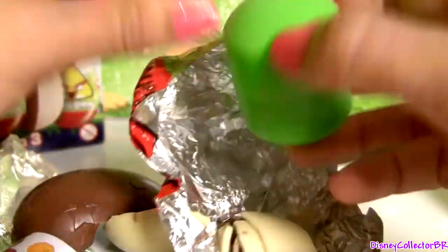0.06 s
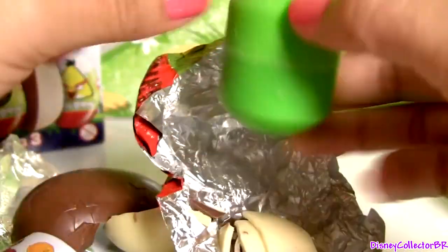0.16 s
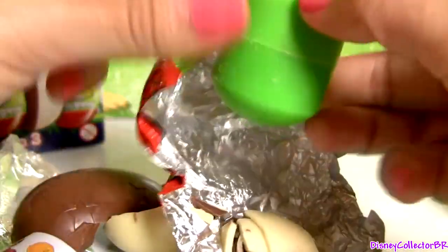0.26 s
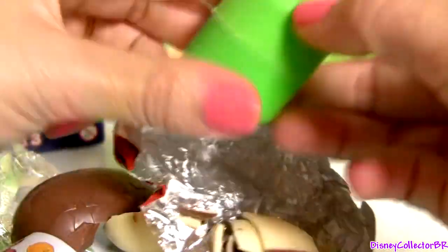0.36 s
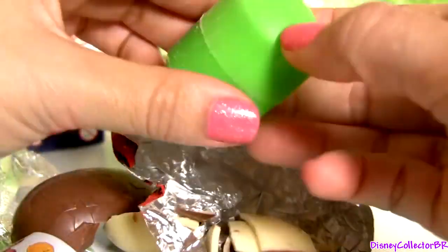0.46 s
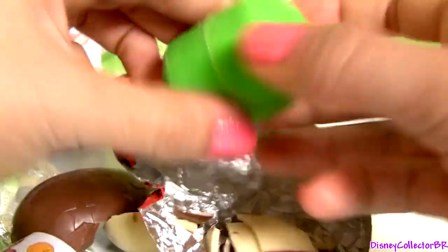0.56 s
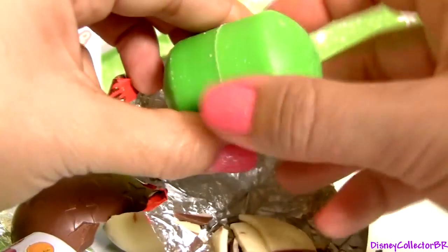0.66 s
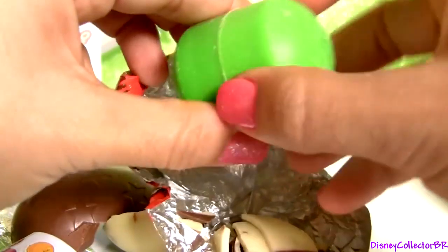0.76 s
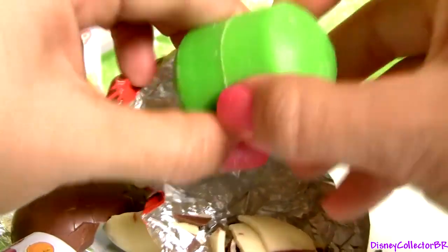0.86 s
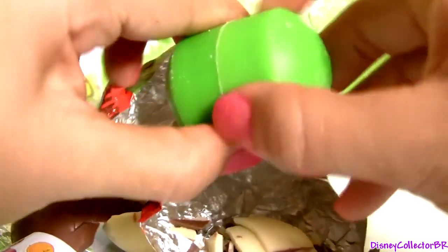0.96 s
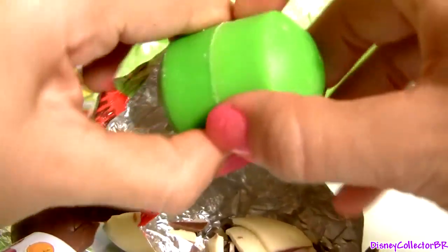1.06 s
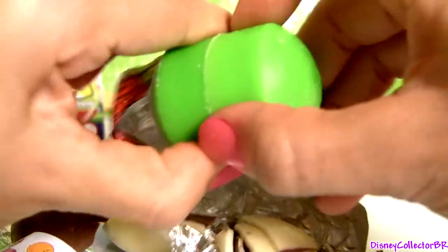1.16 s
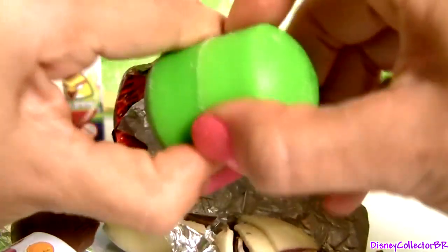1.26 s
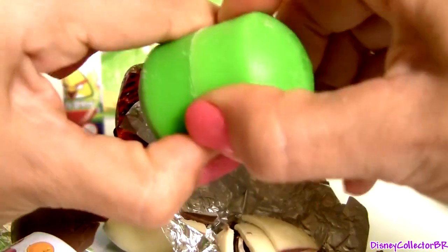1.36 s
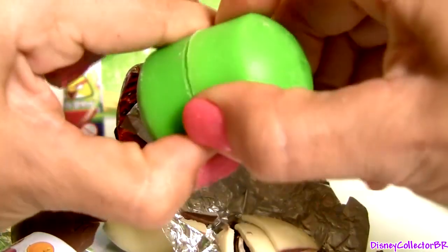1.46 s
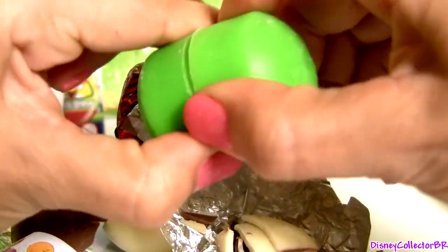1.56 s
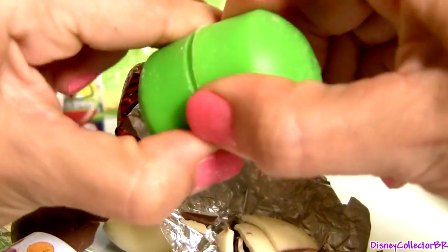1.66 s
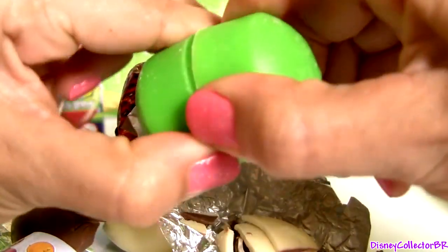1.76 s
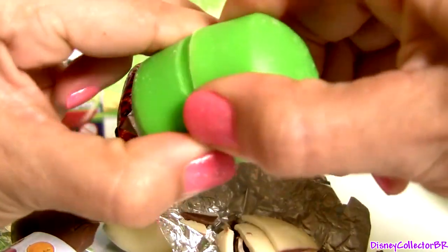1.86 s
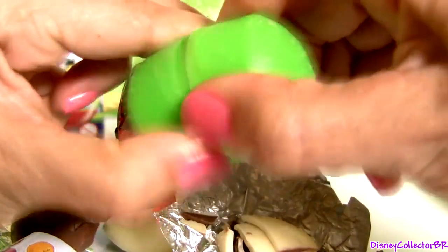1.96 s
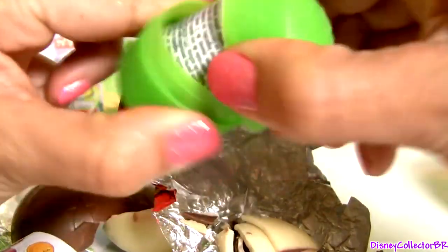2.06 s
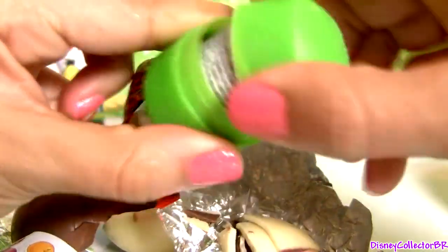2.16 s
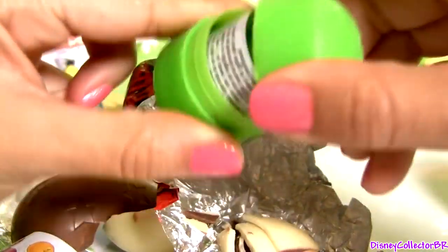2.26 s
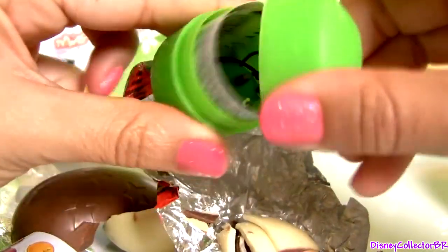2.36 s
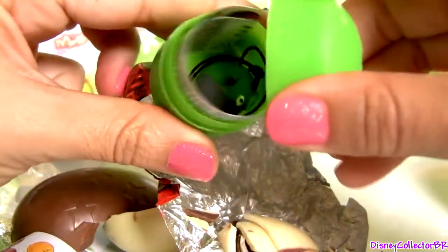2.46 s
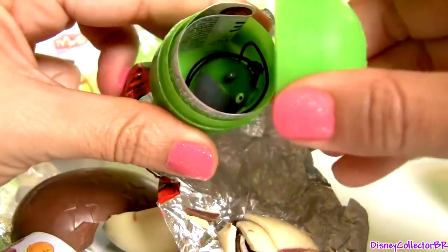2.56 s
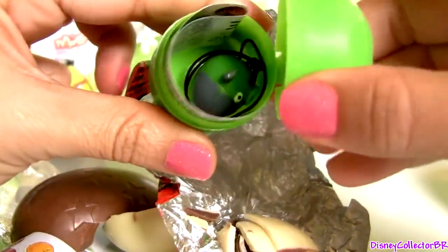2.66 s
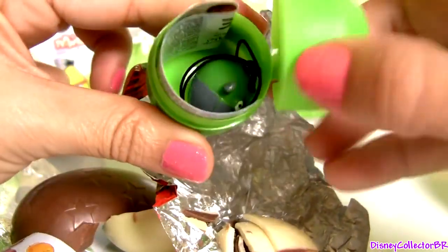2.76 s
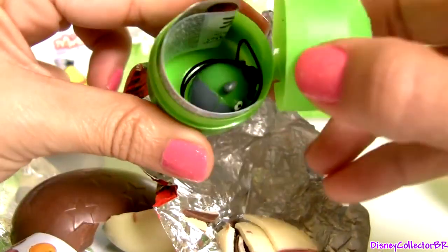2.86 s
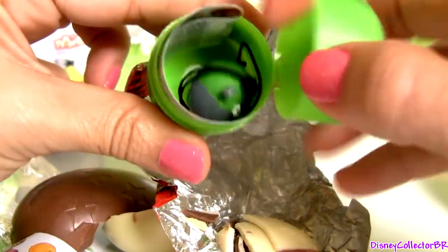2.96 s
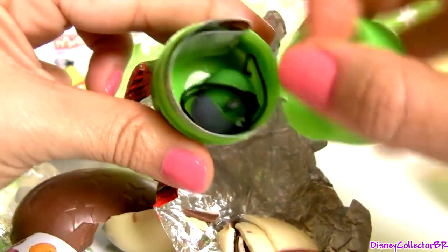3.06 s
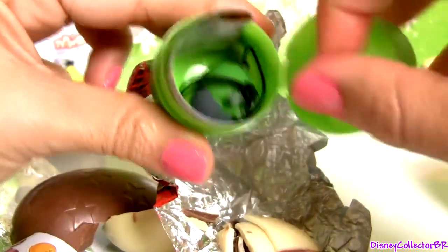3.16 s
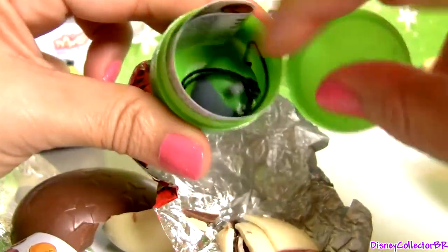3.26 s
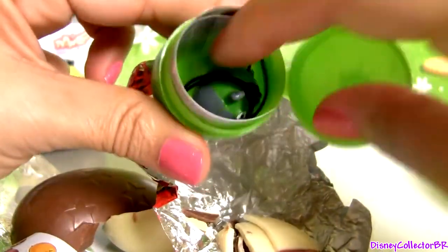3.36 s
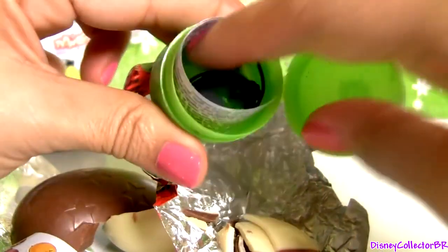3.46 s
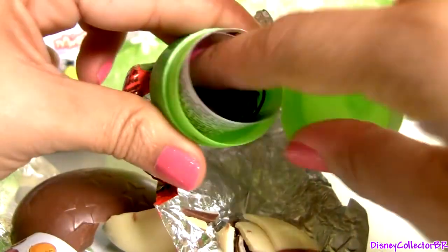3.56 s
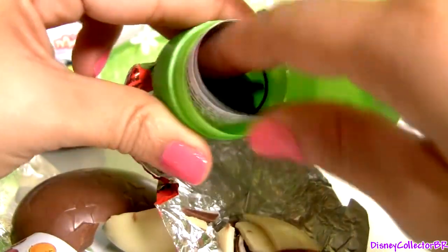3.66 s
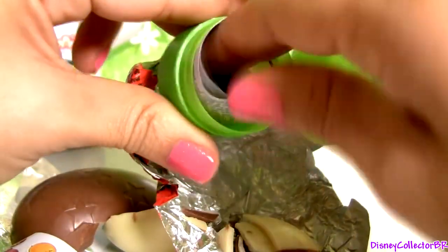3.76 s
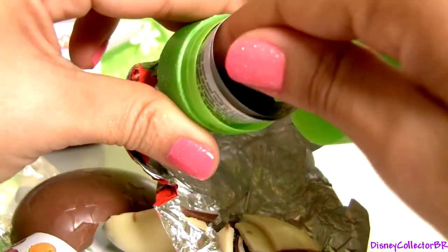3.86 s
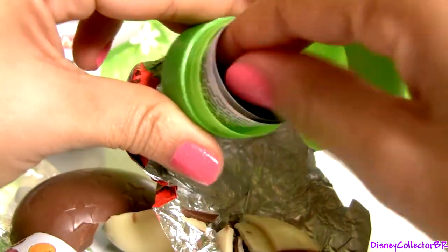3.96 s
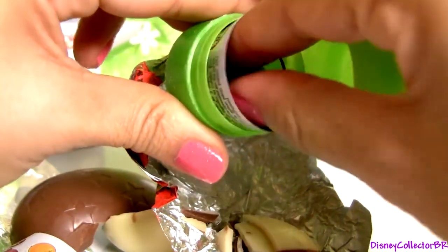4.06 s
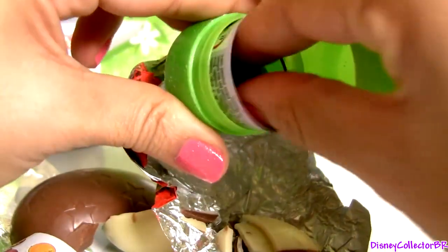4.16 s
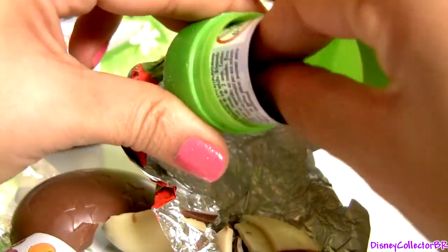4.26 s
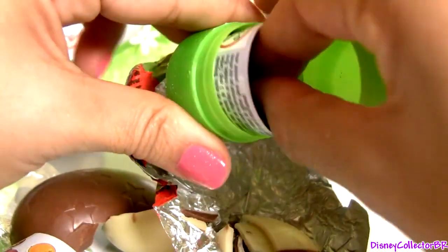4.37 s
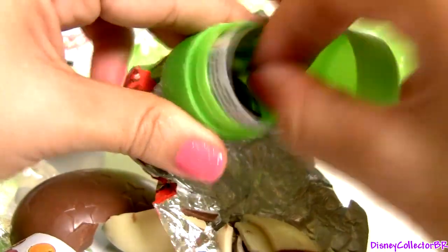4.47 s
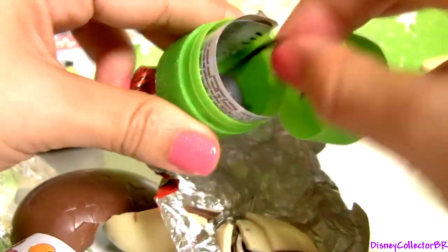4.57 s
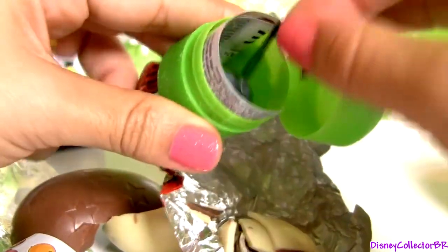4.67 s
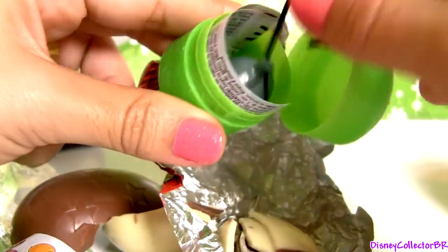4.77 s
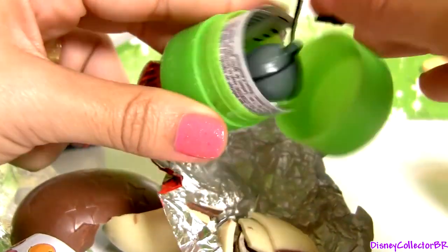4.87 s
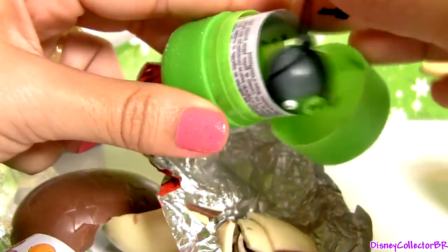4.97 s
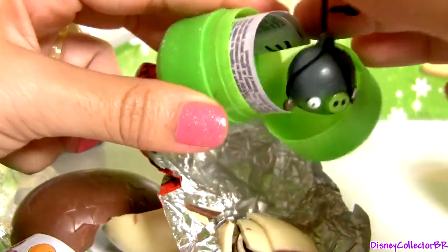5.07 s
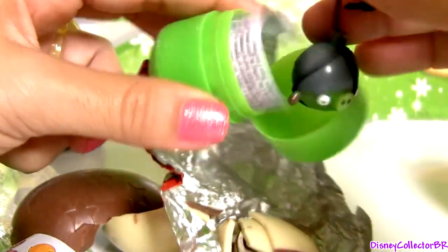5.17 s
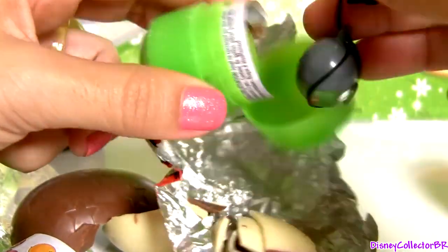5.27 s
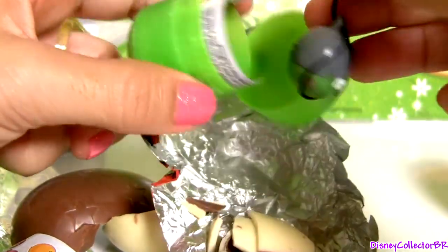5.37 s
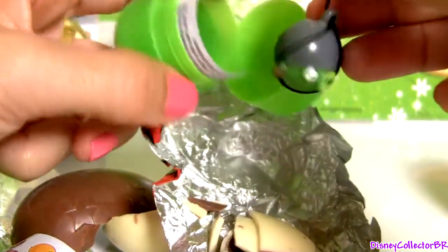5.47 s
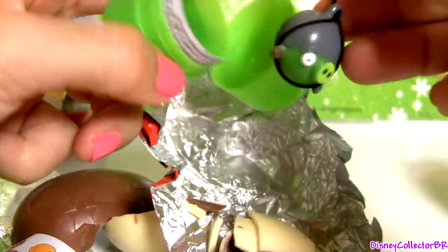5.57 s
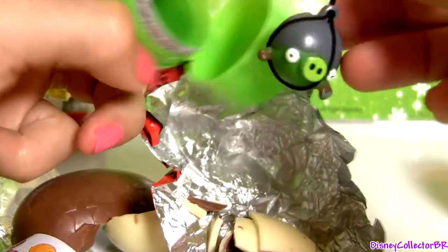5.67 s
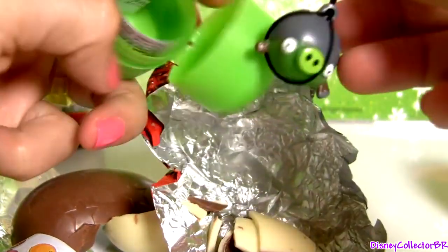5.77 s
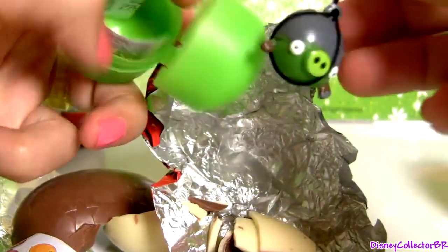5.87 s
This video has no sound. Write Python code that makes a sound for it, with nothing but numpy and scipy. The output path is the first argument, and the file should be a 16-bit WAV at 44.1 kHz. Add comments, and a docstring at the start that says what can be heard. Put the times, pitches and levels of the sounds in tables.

```python
"""Scuffs and clicks of fingers turning a small hollow plastic capsule, a sharp snap as the squeezed seam
gives, and a pop as the lid comes off. Then a toy on a string is fished out past a rolled paper slip.
Skin, nails and paper stick and slip on the shell, which makes it hiss and squeak; each tap or knock
of the toy makes it ring briefly. Behind it all a small room hums and echoes."""
import sys
import numpy as np
from scipy import signal
from scipy.fft import rfft, irfft, next_fast_len
from scipy.io import wavfile
from scipy.ndimage import uniform_filter1d, map_coordinates

SR = 44100
rng = np.random.default_rng(int(sys.argv[2]) if len(sys.argv) > 2 else 0)


def to_wav(sig):
    """Store sig (one row per channel, or 1-D mono) as 16-bit WAV at the path in sys.argv[1].

    Samples outside -1..1 are clipped; the rate is SR.
    """
    pcm = np.clip(np.atleast_2d(sig), -1, 1) * 32767
    pcm = np.round(pcm).astype(np.int16)
    wavfile.write(sys.argv[1], SR, pcm.T)  # frames by channels


N = 260270


def amp(db):
    """Turn decibels into a gain."""
    return 10 ** (np.asarray(db) / 20)


def unit(x):
    """Scale a signal to an average (rms) size of 1."""
    return x / np.sqrt(np.mean(x ** 2) + 1e-20)


def along(points, hz):
    """Read between (f/Hz, value) points on a logarithmic frequency axis."""
    freqs, values = np.transpose(points)
    return np.interp(np.log(hz + 1), np.log(freqs + 1), values)


def curves(rows):
    """Join rows of (t/s, values...) with straight lines: one curve for each value column."""
    times, *columns = np.transpose(rows)
    return [np.interp(np.arange(N) / SR, times, column) for column in columns]


def wobble(rate):
    """A smooth curve through `rate` random points a second."""
    points = rng.standard_normal(int(N * rate / SR) + 4)
    return map_coordinates(points, [np.arange(N) * rate / SR])


def filtered(x, response):
    """Give each frequency in x the gain response(hz)."""
    size = next_fast_len(N + SR // 2)
    return irfft(rfft(x, size) * response(np.fft.rfftfreq(size, 1 / SR)), size)[..., :N]


def stereo_noise(response, likeness, patchy_db):
    """Noise whose tone colour drifts in patches; a likeness of 1 makes left and right the same."""
    spectrum = signal.stft(rng.standard_normal((2, N)), nperseg=256)[2]
    patches = uniform_filter1d(rng.standard_normal(spectrum.shape[1:]), size=2, axis=0)
    patches = uniform_filter1d(patches, size=15, axis=1)
    pair = signal.istft(spectrum * amp(patchy_db * unit(patches)), nperseg=256)[1][:, :N]
    angle = lambda hz: np.arccos(np.clip(along(likeness, hz), -1, 1)) / 2
    mid, side = filtered(pair, lambda hz: response(hz) * [np.cos(angle(hz)), np.sin(angle(hz))])
    return unit(np.array([mid + side, mid - side]))


def room_hum():
    """Steady low room noise with two narrow droning bands."""
    colour = [(28, -2.5), (60, -8), (160, -5.5), (400, -5.5), (1000, -9.5), (1500, -8.5), (2000, -18.5),
              (5000, -27.5), (16000, -33)]  # tone colour of the noise: f/Hz, relative level/dB
    likeness = [(60, 0.017), (500, 0.075), (15000, .05)]  # how alike left and right are: f/Hz, likeness
    drones = [(290, 22, -60), (772, 48, -63.5)]  # droning bands: f/Hz, width/Hz, level/dB
    out = amp(-51) * stereo_noise(lambda hz: amp(along(colour, hz)), likeness, patchy_db=1.0)
    for centre_hz, width_hz, db in drones:
        band = lambda hz: 1 / (1 + ((hz - centre_hz) / width_hz * 2) ** 2)
        out += amp(db) * stereo_noise(band, [(300, 0.87)], patchy_db=1.5)
    return out


def room_echo(x):
    """Table and walls answer after 5 ms; each frequency then dies away at its own speed."""
    fade_times = [(250, 0.47), (2000, 0.3), (12000, 0.069)]  # length of the echo: f/Hz, time to fade by 60 dB/s
    hz, t, spectrum = signal.stft(rng.standard_normal((2, SR // 2)), SR, nperseg=256)
    fade = amp(-60 * t / along(fade_times, hz)[:, None])
    mid, side = signal.istft(spectrum * fade, SR, nperseg=256)[1]
    tail = np.array([mid + .5 * side, mid - .5 * side])
    delayed = np.pad(x, (round(.005 * SR), 0))
    return signal.fftconvolve(delayed[None], tail / np.linalg.norm(tail[0]), axes=1)[:, :N]


def squeaks_and_ringing():
    """Dragging skin makes the shell squeak; the hollow capsule rings on briefly after the toy knocks."""
    # rough tones (the ringing at 5.117 s, the rest squeaks): t/s, length/s, f/Hz, level/dB
    tones = [(0.19, 0.024, 4150, -31), (0.395, 0.04, 3970, -33), (1.185, 0.023, 4630, -45),
             (1.215, 0.02, 4600, -38), (3.402, 0.16, 2650, -50), (3.45, 0.1, 4900, -48),
             (5.117, 0.072, 1954, -48), (5.479, 0.041, 3980, -32)]
    out, t = np.zeros(N), np.arange(N) / SR
    wavering_time = np.cumsum(1 + .06 * wobble(900)) / SR  # makes the pitch unsteady
    flutter = amp(2.7 * wobble(250))
    for start, length, hz, db in tones:
        swell = np.sin(np.pi * np.clip((t - start) / length, 0, 1))
        out += amp(db) * swell * np.sin(2 * np.pi * hz * wavering_time)
    return out * flutter


def rubbing_power():
    """Holding, sliding and slipping add up to the power in the shell wall, the air inside and the hiss."""
    hold = [(0.0, -35.5), (0.23, -47.5), (1.17, -50), (1.35, -74), (1.68, -71), (2.87, -58), (3.37, -55.5),
            (3.7, -48.5), (4.14, -55), (4.58, -49), (4.73, -47), (5.24, -55), (5.59, -58), (5.9, -56)]  # fingers shifting their hold: t/s, level/dB
    # skin and paper sliding: t/s, length/s, level/dB, swell/dB, weight (wall over hiss)/dB
    slides = [(0.0, 0.06, -42.5, 11, -1), (0.107, 0.12, -32.5, 3, -2.5), (0.318, 0.062, -53.5, -3, 6.5),
              (0.372, 0.02, -40, 8, -12), (0.395, 0.095, -32.5, -2.5, -3.5),
              (0.526, 0.02, -40.5, -11, -4.5), (0.634, 0.057, -35.5, -4, -14.5),
              (0.698, 0.1, -40, -18.5, -12.5), (0.796, 0.051, -36.5, -3, -7.5),
              (0.921, 0.15, -42.5, -4.5, -3), (1.074, 0.088, -44.5, 10.5, -4),
              (1.168, 0.125, -39, 4, -15.5), (1.371, 0.042, -38, -10.5, -8.5),
              (1.513, 0.075, -41.5, -0.5, -7.5), (1.605, 0.043, -47.5, -10, -8.5),
              (2.053, 0.057, -36.5, -21, -4), (2.222, 0.042, -50.5, 11, -6), (2.393, 0.048, -52.5, 1, -2),
              (2.517, 0.036, -50, 3, 4), (2.55, 0.068, -56.5, 1, 0), (2.757, 0.017, -38.5, -2, -12),
              (2.774, 0.086, -54, 4, -6), (2.932, 0.016, -48, -15, -1), (3.01, 0.074, -54, 8, -10),
              (3.098, 0.022, -44.5, -2, -13), (3.134, 0.027, -48, -9, -5.5), (3.163, 0.033, -46, -9, -11),
              (3.226, 0.054, -41, -1, -3), (3.394, 0.19, -46, 2, -10), (3.598, 0.153, -49.5, 9, -24),
              (3.762, 0.054, -40.5, 15, -28), (3.837, 0.088, -41.5, 1, -25), (4.1, 0.1, -44, -5, -17),
              (4.276, 0.059, -45.5, 9, -16), (4.382, 0.075, -45, 2, -6), (4.506, 0.1, -46.5, 3, -1),
              (4.622, 0.17, -46.5, -10.5, -3.5), (5.223, 0.1, -46, -7.5, -7), (5.409, 0.026, -39.5, -8, -5),
              (5.435, 0.11, -36, -10.5, -6), (5.558, 0.15, -46.5, 0.5, 0.5), (5.705, 0.067, -42, -6, -4.5),
              (5.801, 0.04, -49.5, 9, -9)]
    slips = [(0.0149, -20, -15), (0.034, -21, -5), (0.103, -21, -7), (0.196, -7.5, -16), (0.397, -8.5, -12),
             (0.46, -18, 1), (0.7033, -22, -12), (0.842, -17.5, -10), (0.916, -18, -24),
             (0.934, -19.5, -15), (0.957, -17.5, -27), (0.9753, -14.5, -31), (0.9927, -17.5, -1),
             (1.035, -12.5, -9.5), (1.2231, -18, -14), (1.378, -14.5, -17.5), (1.389, -19.5, -7),
             (1.5744, -30, -10), (1.6444, -33, -5), (2.0654, -16.5, -10), (2.0954, -30, -10),
             (2.535, -29.5, -8), (2.6805, -36.5, 1), (3.001, -30.5, -8), (3.3054, -19, -1),
             (3.324, -28, -1), (3.3867, -28.5, -4), (3.8616, -17.5, -15), (3.8721, -13, -23),
             (3.9, -23, -11), (3.972, -30, -16), (4.126, -21, -15), (4.3196, -20.5, -15), (4.41, -25, -18),
             (4.513, -26, -12), (4.619, -29, -12), (5.1947, -28, -2), (5.226, -31, -8), (5.283, -11.5, -3),
             (5.439, -12.5, -14), (5.7264, -28, -8), (5.801, -26, -11)]  # a nail catches and slips free: t/s, level/dB, weight/dB
    slide_rise_s, linger_fade_s = 0.0031, 0.21
    slip_rise_s, slip_fade_s = 0.0013, 0.036
    t = np.arange(N) / SR
    open_db = 2 * (t > 1.9)  # the air inside sounds louder once the capsule is open

    def bands(db, weight_db):
        air_db = db - 3.5 + 0.25 * weight_db + open_db
        return amp([db + weight_db, air_db, db]) ** 2

    power = bands(curves(hold)[0] - 4, weight_db=-3)
    for start, length, db, swell_db, weight_db in slides:
        age = t - start
        rise = np.clip(age / slide_rise_s, 0, 1) ** 2
        progress = np.clip(age / length, 0, 1)
        linger_db = (age > length) * (-10 - 60 * (age - length) / linger_fade_s)  # a light drag after
        power += rise * bands(db + swell_db * (progress - .5) + linger_db, weight_db)
    for start, db, weight_db in slips:
        age = np.clip(t - start, 0, 1)
        rise = (1 - np.exp(-age / slip_rise_s)) ** 2
        power += rise * bands(db - 8.5 - 60 * age / slip_fade_s, weight_db)
    return power


def rubbing():
    """Skin, nails and paper stick and slip on the shell, so three bands of noise stutter together."""
    # tone colours of the shell wall, the air inside and the hiss of skin: f/Hz, relative level/dB
    wall = [(47, -43), (80, -17), (233, -7.5), (404, 3), (591, -5), (755, -3.5), (1010, -5), (1500, -14),
            (1950, -15.5), (3300, -120)]
    air = [(590, -53), (1000, -11.5), (1840, 0), (2070, -3), (2250, -5.5), (3400, -9.5), (4420, -15),
           (7480, -120)]
    hiss = [(1530, -68), (2600, -11), (3420, -9), (3920, -4), (5390, -3), (7650, 0), (8840, -5.5),
            (12800, -9), (16000, -11.5)]
    likeness = [(100, 0.74), (600, 1), (2500, 1), (8000, 0.65), (15000, 0.41)]  # how alike left and right are: f/Hz, likeness
    stutter = 1.36 * wobble(110) + 2.16 * wobble(600)
    carry = np.exp(-1 / (0.00052 * SR))  # the shell sounds on for a moment after a touch
    gains = np.sqrt(signal.lfilter([1 - carry], [1, -carry], rubbing_power()))
    hiss_db = 20 * np.log10(gains[-1] + 1e-9)
    pressure = np.clip((hiss_db + 60) / 22, .3, 1.3)  # light slides are smooth, firm ones catch
    gains *= amp(pressure * stutter)
    return sum(gain * stereo_noise(lambda hz: amp(along(colour, hz)), likeness, patchy_db)
               for gain, colour, patchy_db in zip(gains, (wall, air, hiss), (3, 4, 4)))


def lid_pop():
    """The air inside gives short, hollow rising tones, roughened by the scraping rim."""
    glides = [
        [(2.056, 413.8, -25), (2.062, 583, -21), (2.069, 1014, -22), (2.077, 1110, -23), (2.085, 1250, -55)],
        [(2.408, 1690, -51), (2.418, 1724, -35), (2.44, 1810, -43), (2.452, 1850, -54)],
    ]  # one list for the pop, one for a hinge squeak: t/s, f/Hz, level/dB
    out, t = np.zeros(N), np.arange(N) / SR
    for glide in glides:
        hz, db = curves(glide)
        sounding = (t > glide[0][0]) & (t < glide[-1][0])
        out += sounding * amp(db + 3.2 * wobble(300)) * np.sin(2 * np.pi * np.cumsum(hz) / SR)
    return out


def taps_and_snaps():
    """A tap or snap gives a bright crack and rings the shell's own notes, shaped by grip and touch."""
    # taps, snaps and, at 1.915 s, a quick, dull echo of the seam snap:
    # t/s, level/dB, kind, pitch factor set by the grip, hardness (extra tick over thud)/dB
    clicks = [(0.021, -15.5, "pad", 1, 1), (0.1224, -13, "pad", 1.16, -5), (0.158, -12.5, "pad", 1.44, -2),
              (0.1745, -10, "pad", 1.03, 2), (0.2673, -26, "pad", 0.92, -6), (0.329, -28, "pad", .95, -8),
              (0.636, -23, "nail", 0.93, -2), (0.6452, -16, "nail", 1.16, 2),
              (0.6567, -14.5, "nail", 1.02, 7), (0.666, -18, "nail", 0.96, -4),
              (0.7902, -23, "pad", 1.03, 9), (1.136, -25, "pad", 0.9, -5), (1.5402, -5.5, "seam", 0.98, -5),
              (1.9003, 1.5, "seam", 0.95, 4), (1.915, -27, "seam", 0.96, -10), (2.0531, -3, "lid", .97, 0),
              (2.174, -26.5, "toy", 0.91, 3), (2.2299, -26.5, "pad", 1.07, 3),
              (2.2583, -24, "nail", 1.02, 4.5), (2.2987, -31.5, "pad", 1.15, 4),
              (2.7124, -27, "nail", 1.3, 12), (3.557, -29.5, "pad", 1, -6), (3.8735, -10, "nail", .9, 0),
              (4.3079, -11.5, "toy", 0.99, -15), (4.354, -19, "toy", 1.09, 3),
              (4.5484, -15.5, "toy", 1.01, -4), (4.691, -15, "toy", 1.06, -9), (4.74, -32, "toy", 1.1, -3),
              (5.1097, -13, "toy", 1.113, 7.5), (5.125, -30, "toy", 1.13, -4),
              (5.245, -27, "toy", 1.06, -4), (5.261, -28, "toy", 1.02, 1), (5.2795, -10, "lid", 1.15, 8)]
    # the shell's notes in five groups (thud, wall, air, rim, tick): f/Hz, level/dB, time to fade/s
    shell_notes = [
        [(299, 1.5, 0.025), (410, -12.5, 0.071)],
        [(743, 4.5, 0.0099), (1060, -6, 0.017)],
        [(1725, 2.5, 0.0084), (2150, -11, 0.014)],
        [(2860, 3.5, 0.0069), (3390, -1.5, 0.0062)],
        [(4540, -2, 0.0053), (7900, -3, 0.0051)],
    ]
    # how hard finger pad, nail, seam, lid and toy drive the groups: level/dB for each group
    drives = {"pad": (-25.5, -7.5, -7.5, -18.5, -16), "nail": (-27, -31, -25, -10.5, -2),
              "seam": (-19, -9.5, -14.5, -5, -10), "lid": (-12, -11.5, -20, -9.5, -9),
              "toy": (-36, -15.5, -2, -14, -9.5)}
    out, t = np.zeros(N + SR), np.arange(SR // 10) / SR
    rise = (1 - np.exp(-t / 0.00092)) ** 2
    for start, db, kind, pitch, hardness_db in clicks:
        drive_db = drives[kind] + hardness_db * np.linspace(-.5, .5, len(shell_notes))
        bright_noise = signal.lfilter([1, -1], [1, -.4], rng.standard_normal(len(t)))
        sound = amp(drive_db[-1] + 4.5 - 60 * t / 0.0085) * bright_noise  # the crack
        for group, group_db in zip(shell_notes, drive_db):
            for hz, note_db, fade_s in group:
                pitch_scatter, level_scatter = rng.standard_normal(2)
                fade = amp(group_db + 8.5 + note_db + 1.7 * level_scatter - 60 * t / fade_s)
                tone_hz = hz * pitch * (1 + .02 * pitch_scatter)
                sound += fade * np.sin(2 * np.pi * tone_hz * t)
        out[round(start * SR):][:len(t)] += amp(db) * rise * sound
    return out[:N]


def scene():
    """The capsule close in front, the room behind it."""
    capsule = rubbing() + taps_and_snaps() + lid_pop() + squeaks_and_ringing()
    return capsule + amp(-20) * room_echo(capsule.mean(axis=0)) + room_hum()


def record(dry):
    """The microphone's two sides differ a little in tone, and the highest treble is cut off."""
    balance = [(100, -2), (1200, -0.4), (9000, -1.5), (14000, 1.5)]  # lean to one side: f/Hz, left minus right level/dB
    top_hz, edge_hz = 16050, 400
    sides = lambda hz: amp(np.outer([.5, -.5], along(balance, hz)))
    return filtered(dry, lambda hz: sides(hz) * np.clip((top_hz - hz) / edge_hz, 0, 1))


dry = scene()
out = record(dry)
to_wav(out)
```